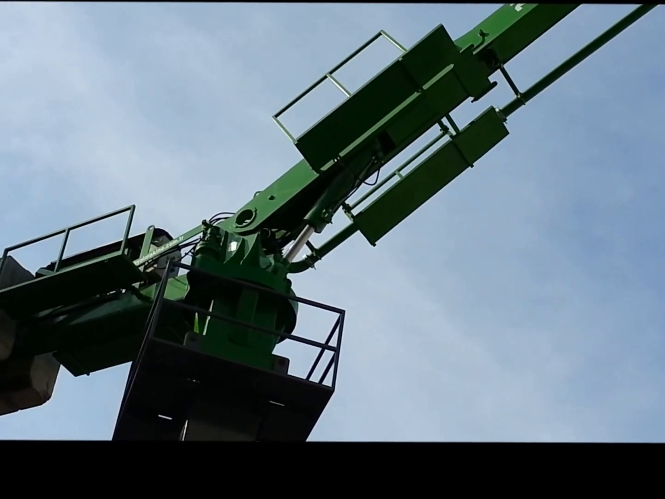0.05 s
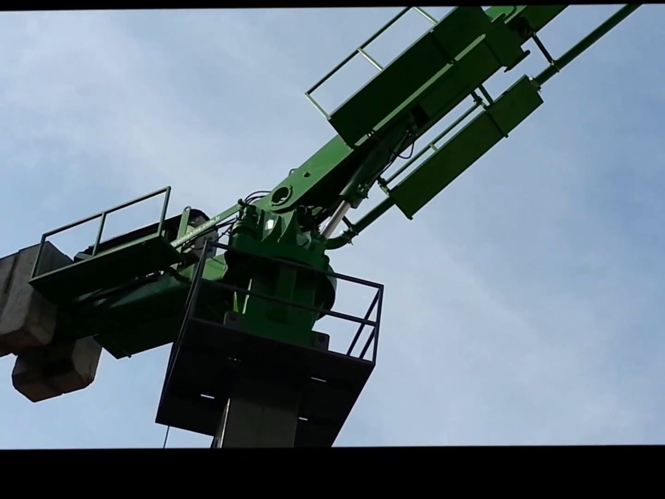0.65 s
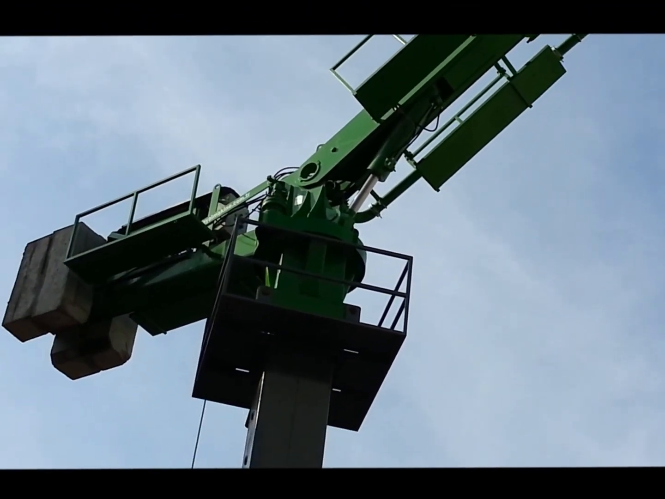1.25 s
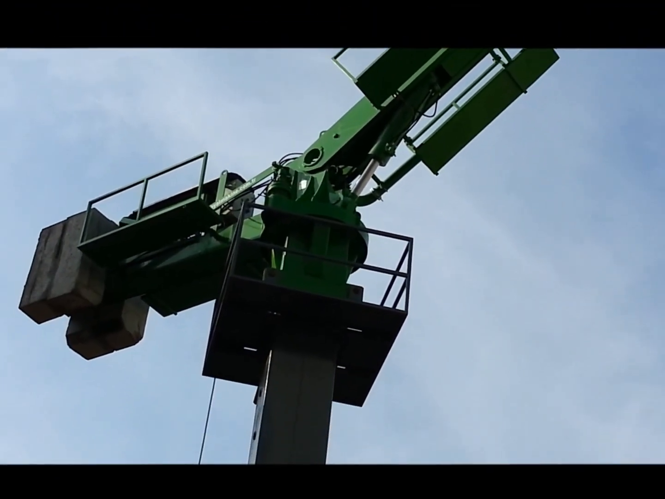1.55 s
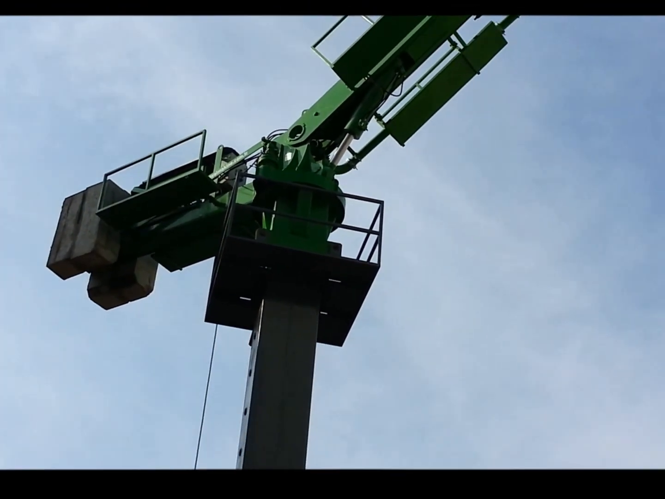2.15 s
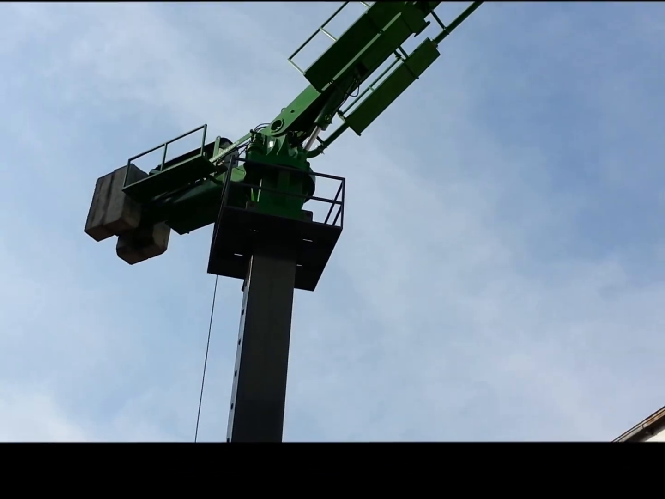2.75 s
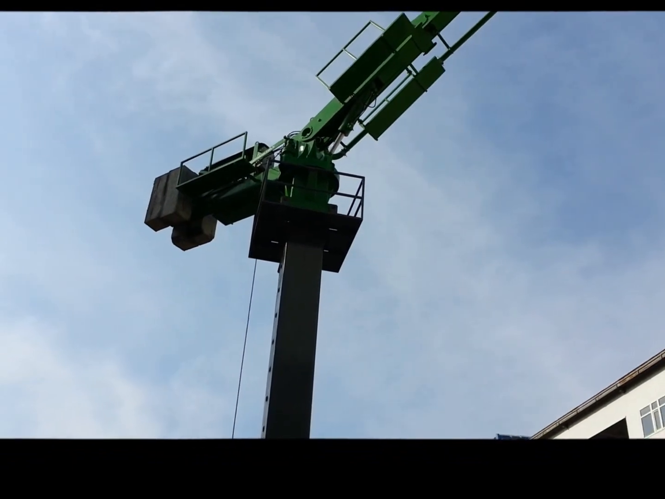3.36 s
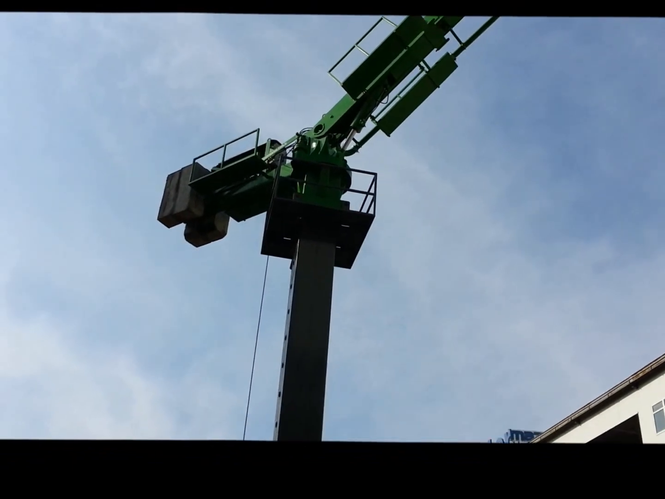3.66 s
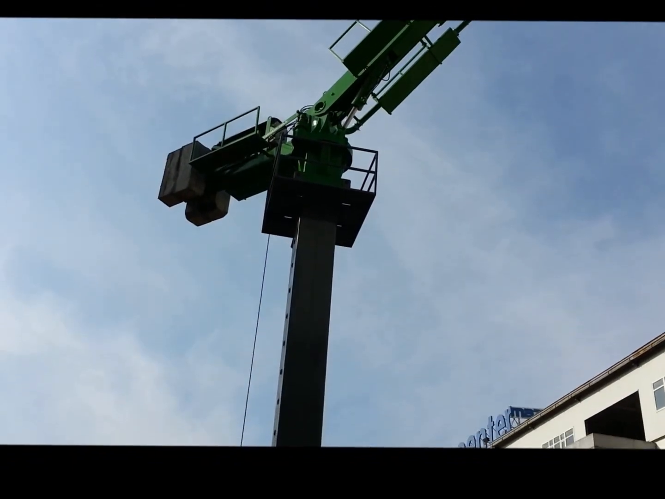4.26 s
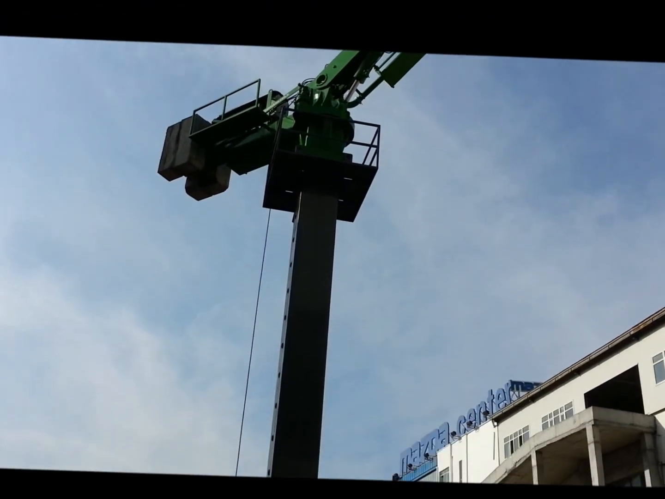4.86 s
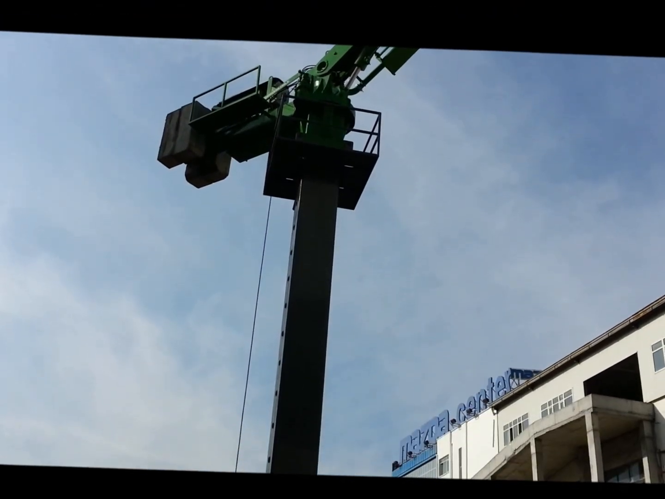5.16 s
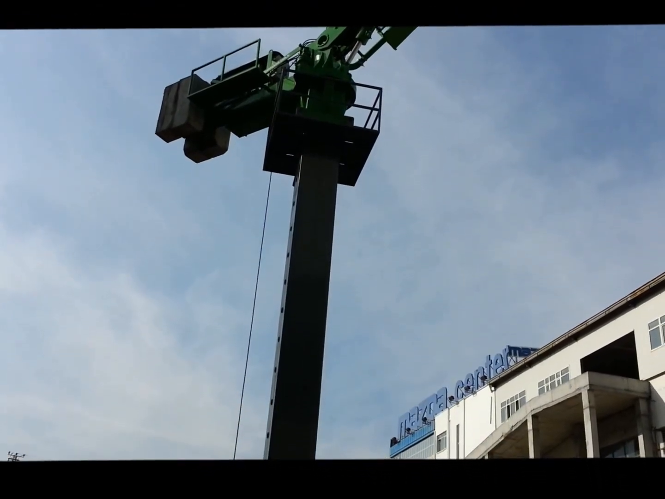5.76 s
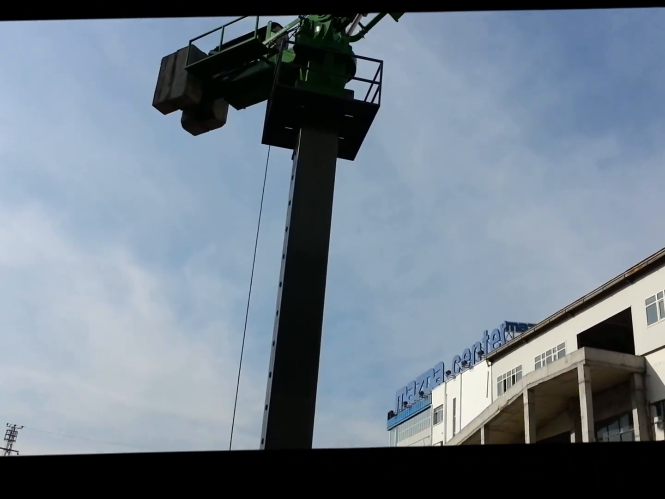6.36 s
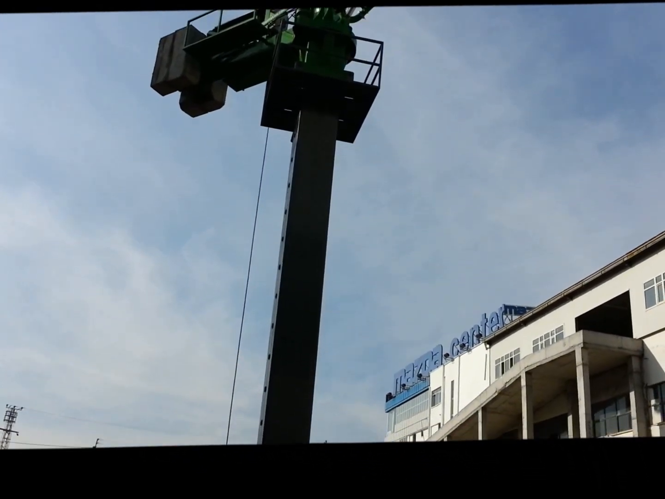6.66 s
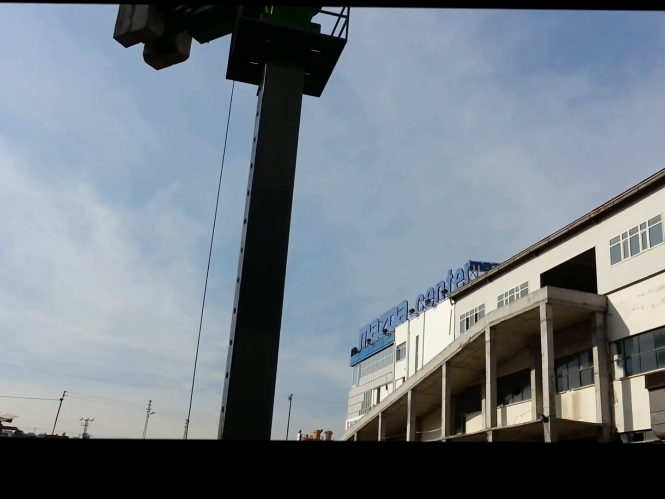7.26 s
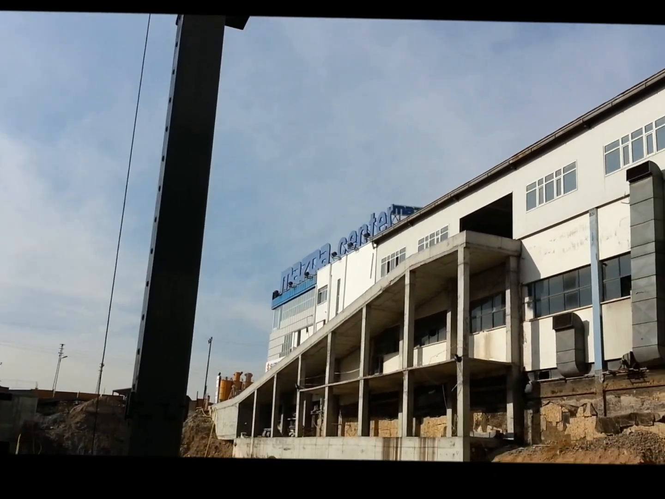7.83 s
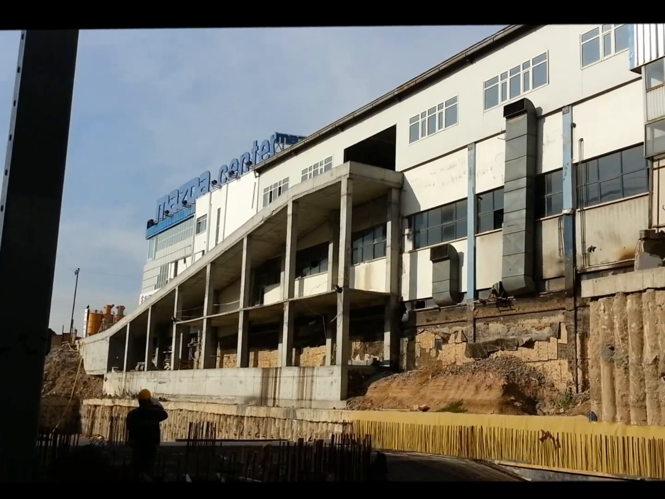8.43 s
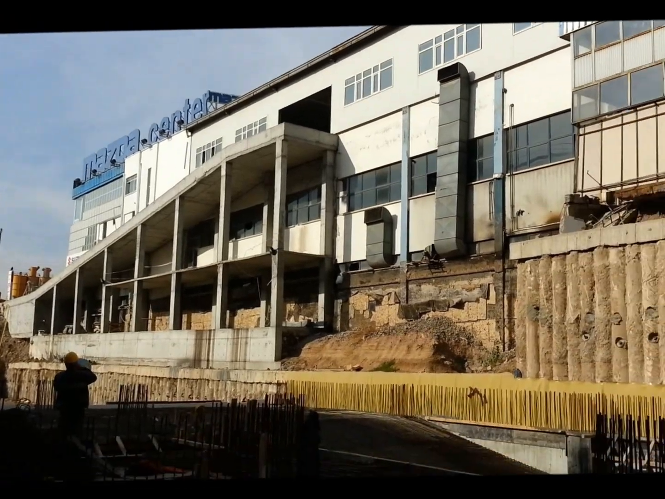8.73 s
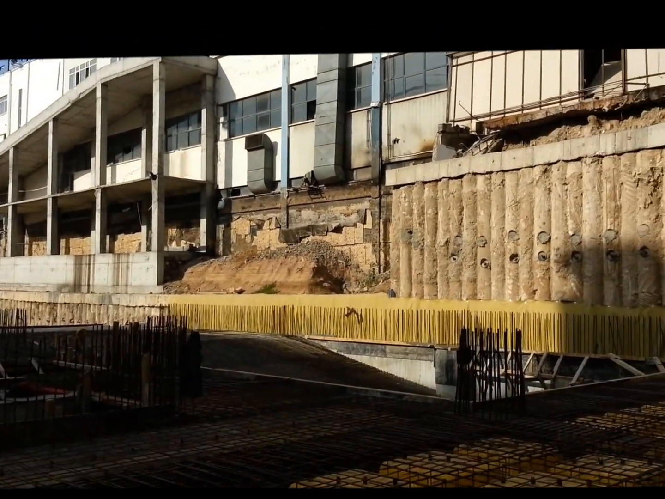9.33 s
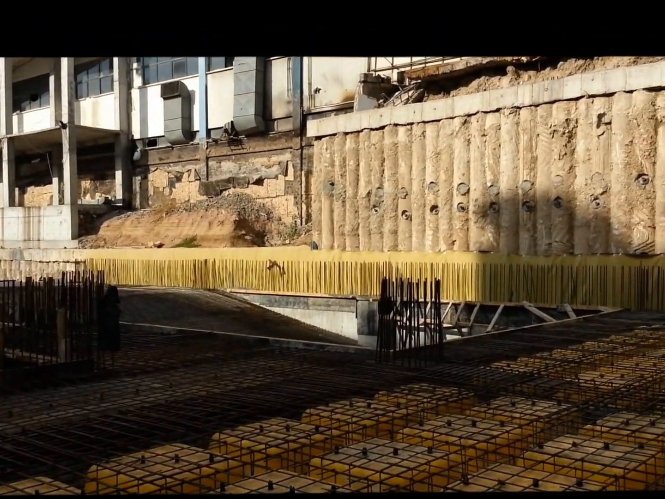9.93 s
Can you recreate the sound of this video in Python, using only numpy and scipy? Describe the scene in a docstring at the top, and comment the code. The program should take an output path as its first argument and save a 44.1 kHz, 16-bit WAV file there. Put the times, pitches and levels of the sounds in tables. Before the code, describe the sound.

Steady engine roar and hydraulic whine from a concrete pump outdoors, broken by regular valve clacks, dull thuds and hissing spurts.

```python
"""An open building site: a diesel concrete pump, heard from a distance by a slowly turning microphone.
Its hydraulic pumps whine over the roar of engine and fan; the pitch sags and recovers with the load.
Every three seconds the valve swings over: a dull thud, ringing clacks and two gritty spurts of hiss,
then a second thud as the next stroke takes hold. Gravel ticks in the pipe; walls echo the impacts."""
import sys
import numpy as np
from scipy import signal
from scipy.io import wavfile

SR = 44100
rng = np.random.default_rng(int(sys.argv[2]) if len(sys.argv) > 2 else 0)


def generate_wav(sig):
    """Save sig (samples, or channels by samples) to the path in sys.argv[1] as 16-bit PCM at SR."""
    pcm = np.round(np.clip(np.atleast_2d(sig).T, -1, 1) * 32767).astype(np.int16)
    wavfile.write(sys.argv[1], SR, pcm)


N = 440559

FIRING_RATIO = .241   # engine firings per piston cycle of the main pump
# valve swings: (time [s], flare of the whine's 4th harmonic [dB])
SWINGS = [(-.41, 5), (2.636, 4), (5.647, 8), (8.648, 5)]
# microphone turn: (time [s], mids left minus right [dB], same for treble [dB], narrow hiss level [dB])
MIC_TURN = [(0, -0.5, -2, -31.5), (3.5, -1, -2, -29.5), (6, -1, -2, -29.5), (8, -0.5, -3, -33),
            (9.2, -2, 1.5, -25.5), (9.99, 3, -2.5, -26.5)]
# widening as it turns away: (time [s], side over mid gain of the roar's mids [dB], of the oil line [dB])
WIDTH = [(0, 0, 2), (8.3, 0, 0), (8.9, 2, 8), (9.25, 1.5, 14), (9.6, 2, 12), (9.99, 3, 4)]


def from_db(db):
    """Decibels to gain."""
    return 10 ** (np.asarray(db) / 20)


def rms_one(x):
    """Scale to rms 1."""
    return x / np.sqrt(np.mean(x ** 2) + 1e-20)


def in_time(rows):
    """Each column of a curve at every sample."""
    times_s, *columns = np.transpose(rows)
    return [np.interp(np.arange(N) / SR, times_s, column) for column in columns]


def at_hz(points, hz):
    """Read a spectrum on a log-frequency axis."""
    points_hz, values = np.transpose(points)
    return np.interp(np.log(hz), np.log(points_hz), values)


def each_swing(shape):
    """One curve repeated around every valve swing."""
    after_s, values = np.transpose(shape)
    return sum(np.interp(np.arange(N) / SR - s, after_s, values, left=0, right=0) for s, _ in SWINGS)


def drift(rate_hz):
    """Smooth random wander, rms about 1."""
    pole = np.exp(-80 * np.pi * rate_hz / SR)
    white = rng.standard_normal(N // 40 + 2002)   # one value per 40 samples
    slow = signal.lfilter([1], [1, -2 * pole, pole * pole], white)[2000:]
    return np.interp(np.arange(N) / 40, np.arange(len(slow)), rms_one(slow))


def pan(db):
    """Left and right gains for a level difference."""
    return from_db(db * np.array([[.5], [-.5]]))


def widen(x, db):
    """Shift weight from mid to side."""
    mid = from_db(-db / 2) * (x[0] + x[1]) / 2
    side = from_db(db / 2) * (x[0] - x[1]) / 2
    return np.array([mid + side, mid - side]) / np.sqrt((from_db(db) + from_db(-db)) / 2)


def narrow_noise(centre_hz, width_hz, order):
    """One band of stereo noise, rms 1."""
    edges_hz = [centre_hz - width_hz / 2, centre_hz + width_hz / 2]
    bandpass = signal.butter(order, edges_hz, "band", fs=SR, output="sos")
    return rms_one(signal.sosfilt(bandpass, rng.standard_normal((2, N))))


def noise_bands(spectrum, white):
    """Yield (Hz, stereo band) of noise shaped to a spectrum; the ears differ more in the treble."""
    # likeness of the ears: (frequency [Hz], correlation [-1..1])
    likeness = [(60, -0.51), (160, 1), (400, 0.75), (750, 0.66), (1300, 0.22), (1900, -0.071), (2550, 0.3),
                (3700, -0.17), (5300, 0.29), (9000, 0.042)]
    # balance: (frequency [Hz], left minus right [dB])
    balance = [(400, 0), (1500, 2), (3000, 1.5), (4400, 4), (5800, 3), (8000, 6.5), (11000, 11),
               (12500, 30)]
    edges_hz = np.geomspace(330, 14800, 35) - 300
    centres_hz = np.sqrt(edges_hz[1:] * edges_hz[:-1])
    inside = (edges_hz[1:] > spectrum[0][0]) & (edges_hz[:-1] < spectrum[-1][0])
    gains = from_db(at_hz(spectrum, centres_hz)) * inside
    gains /= np.sqrt(np.sum(gains ** 2 * np.diff(edges_hz)) * 2 / SR)   # band powers sum to 1
    for k in np.flatnonzero(inside):
        hz = centres_hz[k]
        bandpass = signal.butter(2, edges_hz[k:k + 2], "band", fs=SR, output="sos")
        mid, side = signal.sosfilt(bandpass, white[k % 2])   # neighbours get unrelated noise
        alike = at_hz(likeness, hz)
        mid *= np.sqrt((1 + alike) / 2)
        side *= np.sqrt((1 - alike) / 2)
        yield hz, gains[k] * rms_one(pan(at_hz(balance, hz))) * np.array([mid + side, mid - side])


def bursts(events, colour, grit_db):
    """Coloured noise that swells to each event and dies away; grit makes it rattle."""
    grit = rms_one(from_db(grit_db * drift(170)))[:3 * SR]
    white = rng.standard_normal((2, 2, 3 * SR)) * grit
    noise = sum(band for _, band in noise_bands(colour, white))
    age_s = np.arange(SR) / SR - .5
    out = np.zeros((2, N + SR))
    for s, db, rise_s, decay_s in events:
        start, pick = int(s * SR), rng.integers(2 * SR)
        swell = np.exp(-(age_s / np.where(age_s < 0, rise_s, decay_s)) ** 2)
        out[:, start:start + SR] += from_db(db) * swell * noise[:, pick:pick + SR]
    return out[:, SR // 2:SR // 2 + N]   # each swell peaks half a second in


def struck(hits, modes, contact_s, ear_spread_cycles):
    """Each hit rings a body's modes, slightly retuned, at a different phase in each ear."""
    age_s = np.arange(SR // 3) / SR
    attack = 1 - np.exp(-age_s / contact_s)
    out = np.zeros((2, N + SR))
    for s, db in hits:
        ring = 0
        for hz, mode_db, t60_s in modes:
            cycles = hz * (1 + .015 * rng.normal()) * age_s + rng.random()
            ear_cycles = cycles + ear_spread_cycles * rng.normal(size=(2, 1))
            ring = ring + from_db(mode_db - 60 * age_s / t60_s) * np.sin(2 * np.pi * ear_cycles)
        start = int(s * SR)
        out[:, start:start + len(age_s)] += from_db(db) * attack * ring
    return out[:, :N]


def tone(cycles, scatter, flutter_hz):
    """Direct tone plus a scattered share that flutters differently at each ear; rms 1."""
    scattered = np.array([drift(flutter_hz) + 1j * drift(flutter_hz) for ear in range(2)])
    direct = np.exp(2j * np.pi * (cycles + rng.random()))
    return rms_one(np.real((1 + scatter * scattered) * direct))


def with_echoes(x):
    """Pit walls and buildings each add a dull echo with the sides swapped."""
    # echoes: (delay [s], gain [dB])
    walls = [(0.03, -16), (.074, -11), (.128, -8.5)]
    dull = signal.sosfilt(signal.butter(1, 3000, fs=SR, output="sos"), x[::-1] + 1e-18)
    return x + sum(from_db(db) * np.pad(dull, ((0, 0), (int(s * SR), 0)))[:, :N] for s, db in walls)


def narrow_hiss():
    """A band of hiss stands out as the microphone tilts towards the ground."""
    return from_db(in_time(MIC_TURN)[-1]) * narrow_noise(centre_hz=3660, width_hz=420, order=2)


def oil_line():
    """Turbulent oil keeps one narrow resonance ringing; it flares and fades."""
    # resonance: (time [s], level [dB])
    level = [(0, -36), (.9, -35.5), (1.7, -37), (2.5, -41), (3.3, -38), (3.47, -33), (3.66, -43), (4, -32),
             (4.2, -41), (4.42, -34), (4.65, -42), (5.27, -34), (5.8, -39), (6.4, -38), (7.5, -41),
             (8.6, -39), (9.2, -29), (9.5, -32), (9.65, -42), (9.99, -39)]
    level_db = in_time(level)[0] + 2.5 * drift(5)
    ring = narrow_noise(centre_hz=2112, width_hz=24, order=1)
    return from_db(level_db) * widen(ring, in_time(WIDTH)[1])


def engine_hum(piston_cycles):
    """Exhaust hum at twice the firing rate; engine orders and small pumps keep step with the shaft."""
    # exhaust hum: (time [s], level [dB])
    hum = [(0, -33), (1.9, -35), (2.9, -39.5), (3.66, -33.5), (4.84, -40.5), (5.8, -34.5), (6.42, -33.5),
           (8.2, -38.5), (9.99, -39)]
    # engine orders and auxiliary pumps: (multiple of piston rate [-], level [dB])
    geared = [(.242, -55), (.294, -46), (.667, -40), (.725, -39), (.892, -30), (.931, -38), (.966, -35),
              (1.192, -38), (1.425, -41), (1.696, -36)]
    exhaust = tone(2 * FIRING_RATIO * piston_cycles, scatter=.27, flutter_hz=3.5)
    orders = sum(from_db(db) * tone(ratio * piston_cycles, scatter=.43, flutter_hz=3.8)
                 for ratio, db in geared)
    return from_db(in_time(hum)[0]) * exhaust + orders


def roar(piston_cycles, body_gain_db=7, hiss_gain_db=11, patchy_db=.95, clatter_db=.65):
    """Fan and combustion noise; its treble pulses with the firings and rattles unevenly."""
    # spectrum: (frequency [Hz], relative density [dB])
    colour = [(35, -43), (65, -43), (105, -19), (170, -11.5), (320, -1.5), (560, 0), (850, -0.4),
              (1600, -1.77), (3000, -1.94), (5200, -5), (6600, -12), (8200, -11), (11200, -16.5),
              (13500, -39)]
    # relative levels: (time [s], body [dB], hiss [dB])
    levels = [(0, -21, -29), (2.2, -21, -28), (4.2, -21.5, -28), (5.1, -21, -27), (7.1, -22, -28),
              (7.8, -21.5, -25), (8.4, -22, -26.5), (9.2, -23, -28.5), (9.99, -24.5, -27)]
    # dip after the spurts, surge as the shaft races: (time from swing [s], gain [dB])
    surge = [(-.35, 0), (-.12, -0.5), (0, 0.5), (.06, -1), (.088, -1.5), (.125, 0.5), (.18, 1.9),
             (.38, -0.8)]
    # bass and deep rumble: (time [s], gain [dB])
    bass_gain = [(0, -2), (2.3, -2.5), (3, -1.5), (6, -1), (6.7, -2), (8.1, -3.5), (8.7, -0.5), (9.99, -1)]
    rumble_gain = [(0, -2), (1.5, -2.5), (3.2, 3), (3.9, -2), (4.3, 3), (4.8, -2), (5.4, 1), (7, -3),
                   (8, -1), (8.8, 5), (9.99, 4)]
    body_db, hiss_db = in_time(levels) + each_swing(surge)
    hiss_db += .07 * drift(6.6)
    mid_pan_db, treble_pan_db, _ = in_time(MIC_TURN)
    rumble_db, width_db = in_time(rumble_gain)[0], in_time(WIDTH)[0]
    firing = 1 + .058 * np.cos(2 * np.pi * FIRING_RATIO * piston_cycles)
    clatter = from_db(clatter_db * drift(94)) * firing
    body = from_db(body_db + body_gain_db) * pan(mid_pan_db)
    hiss = from_db(hiss_db + hiss_gain_db) * pan(treble_pan_db) * clatter
    bass = body.mean() * from_db(in_time(bass_gain)[0])   # bends round obstacles, keeps its own level
    out = 0
    for hz, band in noise_bands(colour, rng.standard_normal((2, 2, N))):
        if 1000 < hz < 3000:
            band = widen(band, width_db)
        if hz > 2000:
            gain = body + np.interp(hz, [2000, 5500], [0, 1]) * (hiss - body)
        else:
            gain = bass + np.interp(hz, [200, 900], [0, 1]) * (body - bass)
        waver_db = patchy_db * drift(8.9) + rumble_db * np.interp(hz, [110, 220], [1, 0])
        out = out + band * gain * from_db(waver_db)
    return out


def gravel(rise_s=.00049, decay_s=.002, faint_count=9):
    """Stones tap the pipe wall with short, bright ticks; faint ones fall at random."""
    # sharpest ticks: (time [s], level [dB])
    sharp = [(3.352, -16.5), (6.113, -19.5)]
    # spectrum: (frequency [Hz], relative density [dB])
    colour = [(2000, -12), (4500, 10), (9000, -9), (12000, -4), (14000, -26)]
    faint = [(rng.random() * N / SR, rng.normal(-22, 2)) for _ in range(faint_count)]
    return bursts([(s, db, rise_s, decay_s) for s, db in sharp + faint], colour, grit_db=-5)


def pipe_knocks():
    """Knocks ring the steel pipe wall; coarse concrete rattles as the flow is checked."""
    # knocks: (time [s], level [dB])
    knocks = [(2.355, -22), (2.902, -18), (5.018, -25), (5.702, -18.5), (5.923, -20), (8.353, -16),
              (8.722, -19), (8.957, -13.5)]
    # pipe wall: (frequency [Hz], gain [dB], t60 [s])
    modes = [(440, -4, .12), (640, -2, .09), (740, -3, .1), (883, 1, 0.092), (985, -4, .07),
             (1210, -7, .06), (1470, -13, .05), (2210, -9, .04)]
    # rattles: (time [s], level [dB], rise [s], decay [s])
    rattles = [(2.385, -20, .045, .035), (5.33, -24, .02, .035), (8.36, -18.5, .008, .03),
               (8.41, -20.5, .025, .03)]
    # rattle spectrum: (frequency [Hz], relative density [dB])
    colour = [(200, -12), (400, 1), (800, 0), (1300, -5), (2200, -11), (5000, -28)]
    ring = struck(knocks, modes, contact_s=.001, ear_spread_cycles=.08)
    return ring + bursts(rattles, colour, grit_db=2.5)


def piston_thuds():
    """The piston thuds as it stops and takes hold again; hard hits make the pipe boom."""
    # hard hits: (time [s], level [dB])
    hits = [(2.404, -17.5), (2.434, -18), (2.785, -26), (5.418, -26), (5.84, -24.5), (5.89, -21),
            (5.917, -22.5), (8.4, -15), (8.44, -24)]
    # pipe boom: (frequency [Hz], gain [dB], t60 [s])
    modes = [(228, -1, .17), (275, -2, .15), (330, 0, .15), (400, 1, .14), (450, -4, .1), (655, -6, .08),
             (835, -6, .06)]
    # thuds: (time [s], level [dB], rise [s], decay [s])
    thuds = [(2.375, -20, .02, .03), (2.428, -19, 0.021, 0.043), (2.56, -27, .03, .04),
             (2.8, -19.5, 0.02, 0.036), (2.91, -24, .04, 0.064), (5.33, -19, 0.027, 0.054),
             (5.42, -19, .028, 0.028), (5.49, -27, .03, 0.057), (5.83, -20.5, 0.049, 0.046),
             (5.91, -21, 0.035, 0.08), (8.41, -18.5, 0.043, 0.055), (8.74, -21, .025, 0.044),
             (8.84, -21.5, 0.02, 0.036), (8.97, -20.5, 0.057, 0.082)]
    # thud spectrum: (frequency [Hz], relative density [dB])
    colour = [(100, -27), (150, -14), (220, -0.5), (320, 1.5), (600, -3), (1200, -10.5), (2500, -15),
              (6000, -40)]
    booms = struck(hits, modes, contact_s=.003, ear_spread_cycles=.032)
    return booms + bursts(thuds, colour, grit_db=-1)


def valve():
    """The valve lands and rebounds: each contact cracks and rings the housing; hiss spurts out."""
    # contacts: (time [s], level [dB])
    clacks = [(2.627, -18), (2.652, -23), (2.697, -19.5), (5.629, -23), (5.645, -16), (5.68, -22),
              (5.699, -22), (8.637, -21.5), (8.699, -21), (8.716, -21)]
    # contact noise: (level re clack [dB], rise [s], decay [s])
    crack = (-3, .0015, .008)
    # housing: (frequency [Hz], gain [dB], t60 [s])
    modes = [(2130, -5, .09), (2500, -4.5, .1), (2670, 0, 0.097), (3000, 0, 0.091), (3300, 0, .08),
             (3700, 2, .07), (4070, 0, .09), (4710, -1, .08), (5500, 0, .05)]
    # spurts: (time [s], level [dB], rise [s], decay [s])
    spurts = [(2.651, -12, 0.018, 0.023), (2.686, -14.5, 0.01, .018), (2.835, -18.5, 0.055, .09),
              (3.53, -26, 0.048, .043), (5.655, -12.5, 0.037, 0.016), (5.678, -12.5, 0.0076, 0.026),
              (5.835, -17.5, 0.054, 0.084), (6.53, -19.5, .043, 0.057), (8.66, -13, 0.022, 0.026),
              (8.84, -19, 0.043, .09), (9.53, -22, .043, .043)]
    # spectra: (frequency [Hz], relative density [dB])
    crack_colour = [(2000, -5), (4500, -2), (8000, -8), (11500, -22)]
    spurt_colour = [(1500, -16), (2150, -6), (2700, 7.5), (4400, 10.5), (6500, 1), (9000, -2), (11500, -17),
                    (13500, -34)]
    crack_db, rise_s, decay_s = crack
    contacts = [(s + rise_s, db + crack_db, rise_s, decay_s) for s, db in clacks]
    cracks = bursts(contacts, crack_colour, grit_db=6)
    ring = struck(clacks, modes, contact_s=.0008, ear_spread_cycles=.16)
    hiss = bursts(spurts, spurt_colour, grit_db=2.5)
    return (cracks + ring + hiss) * pan(db=-4)


def pump_whine(piston_cycles, piston_hz, free_hz=524, left_lag_rad=.22, overtone_gain_db=3.5):
    """Piston ripple of the main pump: a firm fundamental and overtones that the site scatters."""
    # fundamental: (time [s], level [dB])
    fundamental = [(0, -21), (.3, -17), (.55, -17.5), (1.1, -18), (2.2, -19), (3.25, -19.5), (3.38, -21.5),
                   (3.55, -20), (4.3, -22.5), (4.6, -21.5), (4.85, -23), (5.3, -20), (6.3, -20), (7, -19),
                   (8.1, -22.5), (8.5, -21.5), (8.9, -24.5), (9.25, -21), (9.52, -31), (9.61, -36),
                   (9.72, -22.5), (9.87, -18.5), (9.99, -27)]
    # two dropouts as the oil is switched over: (time from swing [s], gain [dB])
    unloading = [(-.3, 0.5), (-.07, 0.5), (0, -10.5), (.055, 2.5), (.115, -12.5), (.27, 2)]
    # harmonics 2-4: (time [s], relative level [dB])
    second = [(0, -39), (1.55, -39), (1.85, -33), (2.25, -38), (2.55, -30.5), (3.15, -38), (3.75, -37),
              (3.92, -29.5), (4.25, -31), (4.43, -42), (4.6, -29.5), (4.85, -35), (5.06, -28.5), (5.7, -39),
              (6.4, -38), (6.8, -34), (7.45, -31.5), (8.2, -34.5), (8.8, -42), (9.99, -38)]
    third = [(0, -32), (.6, -39), (1.8, -41), (2.65, -41), (2.82, -27), (3, -33), (3.25, -29), (3.55, -40),
             (4.05, -38), (4.18, -31), (4.38, -31.5), (4.7, -40), (4.9, -31.5), (5.12, -31), (5.25, -38),
             (5.68, -43), (5.8, -27), (6.05, -33), (6.3, -30.5), (7.1, -33.5), (7.8, -30.5), (8.4, -34),
             (9.2, -34), (9.5, -41.5), (9.99, -43)]
    fourth = [(0, -30), (.8, -33), (2.6, -36), (3.02, -26), (3.4, -32), (3.64, -35), (3.85, -27),
              (4.65, -40), (5.03, -30), (5.7, -37), (6.3, -30), (6.65, -37), (6.92, -30.5), (7.2, -36),
              (8, -37), (9.99, -42)]
    # harmonics 2-4 at the ears: (left minus right [dB], left lead [rad])
    ears = [(0, -.3), (1, -.3), (-1, -1.1)]
    left_cycles_per_rad = np.array([[1], [0]]) / (2 * np.pi)
    throb_db = .9 + .16 * np.maximum(free_hz - piston_hz, 0)   # deeper as the load slows the shaft
    whine_db = in_time(fundamental)[0] + each_swing(unloading) + throb_db * drift(31)
    ear_cycles = piston_cycles - left_lag_rad * left_cycles_per_rad
    out = from_db(whine_db) * tone(ear_cycles, scatter=.062, flutter_hz=3.6)
    # the 4th harmonic flares about half a second after each swing, as the shaft races
    flare_db = sum(db * np.exp(-((np.arange(N) / SR - s - .57) / .125) ** 2) for s, db in SWINGS)
    levels_db = in_time(second)[0], in_time(third)[0], in_time(fourth)[0] + flare_db
    for multiple, level_db, (pan_db, lead_rad) in zip((2, 3, 4), levels_db, ears):
        ear_cycles = multiple * piston_cycles + lead_rad * left_cycles_per_rad
        overtone = tone(ear_cycles, scatter=.48, flutter_hz=22)
        fade_db = drift(7)
        out += from_db(level_db + overtone_gain_db + fade_db) * pan(pan_db) * overtone
    return out


def scene():
    """One shaft paces whine, hum and firing pulses; impacts and spurts echo round the site."""
    # shaft speed, lower in stiff concrete: (time [s], main pump piston rate [Hz])
    shaft = [(0, 521.9), (2.3, 521.7), (3.5, 521.4), (4.1, 520.7), (4.55, 510.6), (4.85, 511), (5.1, 518.3),
             (5.4, 523.2), (8.3, 523.4), (9.4, 524.6), (9.75, 515), (9.99, 511)]
    # dragged down at stroke end, races when freed, settles: (time from swing [s], rate change [Hz])
    governor = [(-.23, 0), (-.13, -12), (-.04, -8), (.02, 1), (.15, 10.5), (.35, 1), (.56, 5.5), (.82, 0)]
    piston_hz = in_time(shaft)[0] + each_swing(governor) + .35 * drift(6.5)
    piston_cycles = np.cumsum(piston_hz) / SR
    machine = pump_whine(piston_cycles, piston_hz) + engine_hum(piston_cycles) + roar(piston_cycles)
    steady = machine + oil_line() + narrow_hiss()
    return steady + with_echoes(valve() + piston_thuds() + pipe_knocks() + gravel())


def record(dry, cutoff_hz=14500):
    """Clip at full scale, then low-pass steeply."""
    lowpass = signal.ellip(10, .1, 90, cutoff_hz, fs=SR, output="sos")
    return signal.sosfilt(lowpass, np.clip(dry, -1, 1))


dry = scene()
out = record(dry)
generate_wav(out)
```